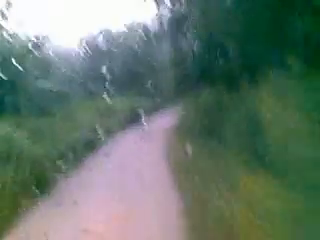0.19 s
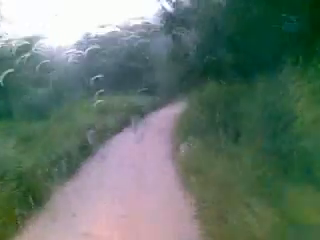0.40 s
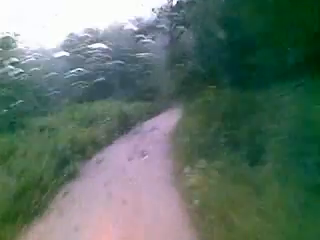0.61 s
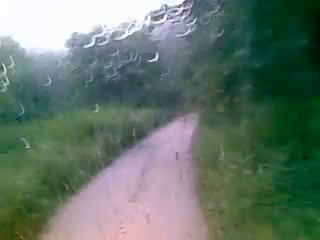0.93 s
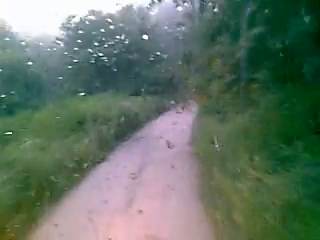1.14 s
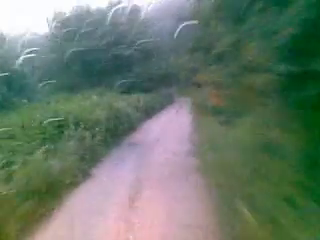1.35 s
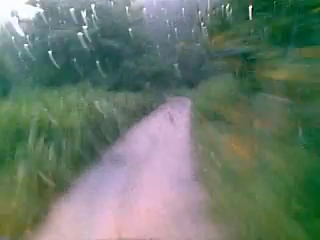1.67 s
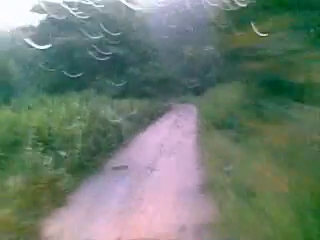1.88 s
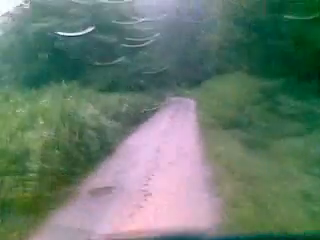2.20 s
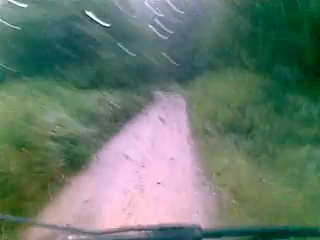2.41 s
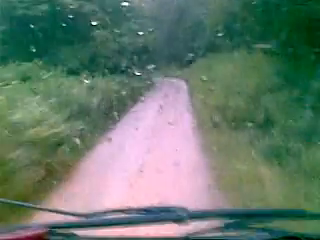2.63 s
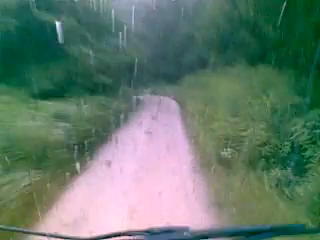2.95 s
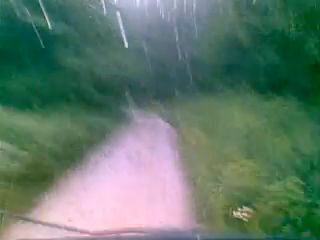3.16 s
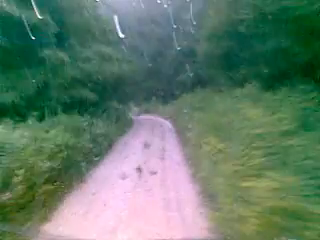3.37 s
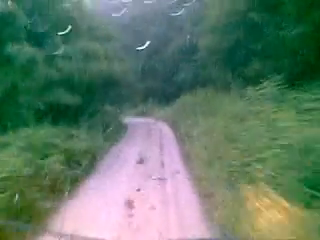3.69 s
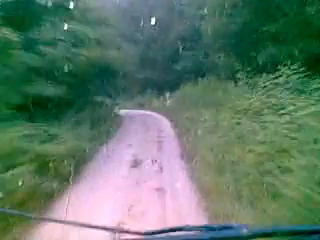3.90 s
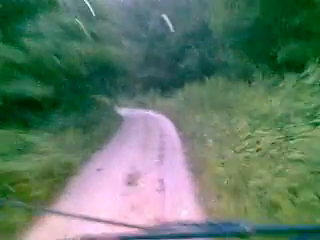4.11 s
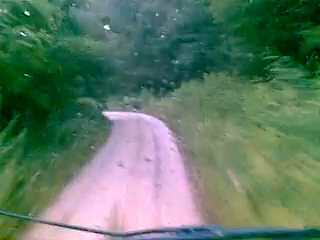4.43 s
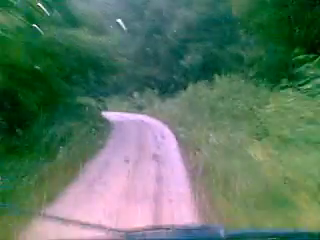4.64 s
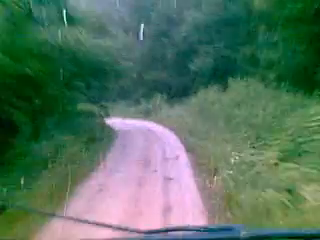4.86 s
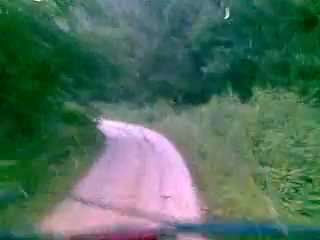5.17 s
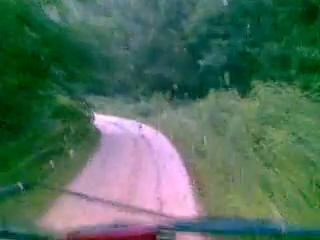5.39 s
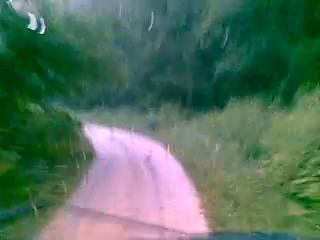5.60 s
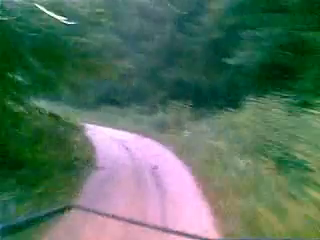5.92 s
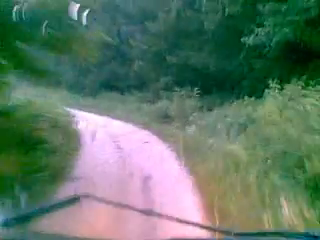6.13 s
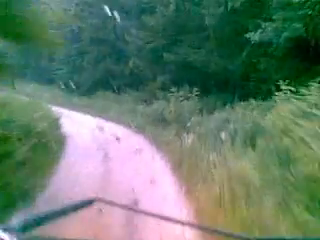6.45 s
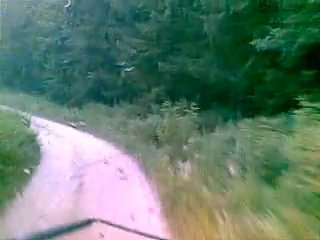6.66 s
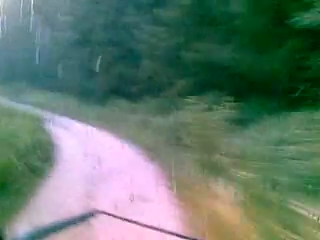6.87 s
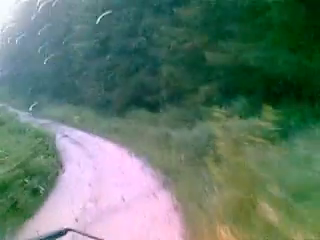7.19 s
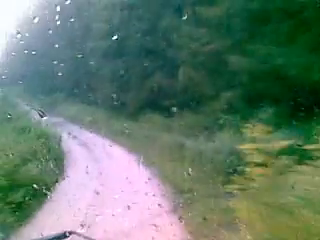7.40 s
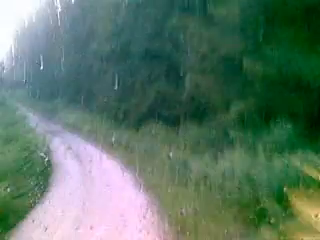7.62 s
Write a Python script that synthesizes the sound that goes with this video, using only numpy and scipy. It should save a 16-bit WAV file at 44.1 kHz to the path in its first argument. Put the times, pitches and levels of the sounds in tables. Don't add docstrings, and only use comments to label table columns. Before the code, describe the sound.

Inside a heavy diesel truck's cab on a rough track, a deep boom swells over ruts while the engine knocks and loose metal jingles.

```python
import sys
import numpy as np
from scipy import signal
from scipy.io import wavfile
from scipy.ndimage import uniform_filter1d

SR = 44100
rng = np.random.default_rng(int(sys.argv[2]) if len(sys.argv) > 2 else 0)


def linear_from_db(decibels):
    return 10 ** (np.asarray(decibels, float) / 20)


def output_pcm(signal):
    pcm = np.clip(np.atleast_2d(signal).T, -1, 1) * 32767
    wavfile.write(sys.argv[1], SR, np.round(pcm).astype(np.int16))


N = 344851
T = np.arange(N) / SR

# time in seconds, peak level of the knock in dB.
LOAD = [(0, -29), (.6, -30), (1.2, -32), (2, -32), (2.6, -29), (3.3, -28), (3.8, -29), (4.5, -27.5),
        (5.1, -27), (5.55, -26.5), (5.66, -32), (6.1, -37), (7.82, -42)]


def evened(x):
    return x / np.sqrt(np.mean(x ** 2) + 1e-20)


def columns(rows):
    s, *rest = np.transpose(rows)
    return [np.interp(T, s, column) for column in rest]


def add(mix, s, sound):
    part = mix[round(s * SR):][:len(sound)]
    part += sound[:len(part)]


def resonate(x, hz, width):
    return signal.lfilter(*signal.iirpeak(hz, hz / width, SR), x)


def drift(per_s):
    knots = rng.standard_normal(N // 64 + 1002)
    lowpass = signal.butter(2, min(per_s * 128 / SR, .9))
    smooth = signal.filtfilt(*lowpass, knots)[500:-500]
    return np.interp(np.arange(N) / 64, np.arange(len(smooth)), evened(smooth))


def bell(s, half):
    return np.exp(-.5 * ((T[::64] - s) / half) ** 2).repeat(64)[:N]


def swells(rows):
    return sum(linear_from_db(db) * bell(s, half) for s, db, half in rows)


def ring(modes, detune=0, shade_db=0):
    t = np.arange(4000) / SR
    out = np.zeros(len(t))
    for hz, db, t60 in modes:
        pitch = hz * (1 + detune * rng.standard_normal())
        level_db = db + shade_db * rng.standard_normal()
        out += linear_from_db(level_db - 60 * t / t60) * np.sin(2 * np.pi * pitch * t)
    return out * (1 - np.exp(-t / .0012))


def noise(shape, band, patchy_db, flicker_db, size):
    frames, hz = 4 * N // size + 5, np.fft.rfftfreq(size, 1 / SR)
    a, b, patches = rng.standard_normal((frames, len(hz), 3)).T
    patches = uniform_filter1d(patches, size=5, axis=0)
    patches = evened(uniform_filter1d(patches, size=9, axis=1))
    flicker = evened(uniform_filter1d(rng.standard_normal(frames), size=3))
    f, db = np.transpose(shape)
    colour = linear_from_db(np.interp(np.log(hz + 1), np.log(f + 1), db, left=-120, right=-120))
    z = (a + 1j * b) * colour[:, None] * linear_from_db(patchy_db * patches + flicker_db * flicker)
    inside = (hz > band[0]) & (hz < band[1])
    share = np.sqrt((abs(z[inside]) ** 2).sum() / (abs(z) ** 2).sum())
    sound = signal.istft(z, nperseg=size, noverlap=3 * size // 4)[1][:N]
    return evened(sound) / share


def cycles():
    # time in seconds, four-stroke cycles turned.
    turned = [(-0.034, -1), (0.055, 0), (0.766, 8), (1.488, 16), (2.219, 24), (2.956, 32), (5.163, 56),
              (5.533, 60), (5.72, 62), (5.912, 64), (6.294, 68), (6.68, 72), (7.071, 76), (7.465, 80),
              (7.95, 84.85)]
    return uniform_filter1d(columns(turned)[0], size=4001, mode="nearest")


def boom(turn):
    # time in seconds, peak level in dB, half length in seconds.
    ruts = [(0.006, -22.5, 0.28), (0.187, -21, 0.033), (0.362, -21.5, 0.02), (0.546, -22.5, 0.11),
            (0.855, -20, 0.042), (1.016, -16, 0.047), (1.211, -21, 0.069), (1.456, -16, 0.083),
            (1.738, -18, 0.066), (1.946, -20, 0.17), (2.457, -21, 0.057), (2.71, -22.5, 0.12),
            (3.024, -21, 0.031), (3.199, -24.5, 0.039), (3.383, -21, 0.11), (3.585, -19.5, 0.063),
            (3.939, -19, 0.059), (4.124, -22, 0.051), (4.342, -21, 0.13), (4.789, -24.5, 0.067),
            (5.075, -31, 0.068), (5.272, -29.5, 0.039), (5.545, -23.5, 0.083), (5.988, -17, 0.16),
            (6.282, -19.5, 0.076), (6.579, -24.5, 0.15), (6.869, -15, 0.076), (7.053, -18, 0.13),
            (7.384, -18, 0.085), (7.713, -20.5, 0.32)]
    # time in seconds, half length in seconds, drop in Hz.
    slack = (4.9, .2, 4.5)
    s, half, sag_hz = slack
    slip_hz = 1.6 - sag_hz * bell(s, half)
    phase = 2 * np.pi * (4 * turn + np.cumsum(slip_hz) / SR) + .35 * drift(14)
    rest_db = -40
    size = uniform_filter1d(linear_from_db(rest_db) + swells(ruts), size=128)
    return size * linear_from_db(1.2 * drift(18)) * np.sin(phase)


def hum(turn):
    orders = [8, 16, 21.3]
    rest_db = [-40, -44.5, -46.5]
    per_load = [0, 0, 0.86]
    # time in seconds, peak level in dB, half length in seconds.
    surges = [
        [(.12, -34, 0.07), (1.36, -27.5, 0.017), (1.81, -37, 0.04), (2.26, -32, 0.031), (2.85, -42, .15),
         (3.27, -25, 0.048), (3.49, -33, 0.052), (4.02, -37, 0.23), (4.65, -35.5, 0.048), (5.16, -32, 0.052),
         (5.47, -31, 0.022), (5.91, -28.5, 0.086), (6.3, -32.5, 0.032), (6.95, -33.5, 0.14)],
        [(1.1, -47.5, 0.24), (3.16, -38, 0.045), (5.98, -49, 0.15), (6.3, -43, 0.058), (6.9, -47, 0.043)],
        [(1.15, -41, 0.045), (1.65, -42, 0.066), (2.3, -41, 0.11), (2.52, -38.5, 0.057), (3.05, -39.5, 0.052),
         (4.37, -40, 0.051), (4.85, -38, 0.076)],
    ]
    # waves per engine cycle, level in dB.
    lumps = [(2, -40.5), (3, -63), (5, -61), (6, -52.5), (10, -50.5), (11, -50), (13, -52), (14, -50),
             (18, -62.5), (19, -51.5), (24, -59), (30, -61)]
    load_db = columns(LOAD)[0] + 29.0
    strong, faint = np.zeros(N), np.zeros(N)
    for order, db, share, rows in zip(orders, rest_db, per_load, surges):
        size = linear_from_db(db + share * load_db + 1.8 * drift(5.7)) + swells(rows)
        strong += size * np.sin(2 * np.pi * order * turn + .45 * drift(4.9))
    for order, db in lumps:
        wave = np.sin(2 * np.pi * (round(order) * turn + rng.random()))
        faint += linear_from_db(db + 1.5 * drift(9.8)) * wave
    return strong + np.sqrt(2) * faint


def blows(turn, place, db):
    at = np.flatnonzero(np.diff(np.floor(turn - place)) > 0)
    late, uneven_db = rng.standard_normal((2, len(at)))
    out = np.zeros(N)
    where = np.clip(at + (6 * late).astype(int), 0, N - 1)
    out[where] = linear_from_db(db + np.interp(T[at], *np.transpose(LOAD)) + uneven_db)
    return out


def knock(turn):
    # place as a fraction of the cycle, pitch in Hz, half length in seconds.
    loudest = (.02, 1130, .0008)
    # place as a fraction of the cycle, level in dB.
    lesser_knocks = [(.055, -9), (.1, -10), (.27, -9), (.39, -7), (.45, -7), (.53, -13), (.65, -10),
                     (.73, -11), (.8, -13), (.89, -8)]
    # place as a fraction of the cycle, level in dB.
    sump_knocks = [(.015, -11), (.23, -13), (.39, -14), (.45, -14), (.87, -13), (.95, -14)]
    # pitch in Hz, level in dB, time to die by 60 dB in seconds.
    block = [(925, -7, .025), (1050, -2.5, .022), (1220, -3, .018), (1350, -5, .018), (1535, -15, .015),
             (2050, -13, .012), (640, -9, .02)]
    # pitch in Hz, level in dB, time to die by 60 dB in seconds.
    sump = [(925, 0, .05)]
    place, hz, half = loudest
    t = np.arange(-150, 151) / SR
    tick = np.exp(-.5 * (t / half) ** 2) * np.sin(2 * np.pi * hz * t)
    out = signal.oaconvolve(blows(turn, place, 1.2), tick, "same")
    body = ring(block)
    lesser = sum(blows(turn, *row) for row in lesser_knocks)
    out += signal.oaconvolve(lesser, body / abs(body).max())[:N]
    low = sum(blows(turn, *row) for row in sump_knocks)
    out += signal.oaconvolve(low, ring(sump))[:N]
    taps = rng.standard_normal(N) * linear_from_db(4.4 * drift(56))
    clatter = evened(signal.oaconvolve(taps, body)[:N])
    return out + linear_from_db(-60.5 + 3.9 * (columns(LOAD)[0] + 29.0)) * clatter


def whines(turn):
    # start in seconds, end in seconds, start pitch in Hz, end pitch in Hz, level in dB.
    glides = [(0, 1.5, 1068, 1053, -52), (5.8, 6.2, 655, 664, -59), (6.28, 6.95, 661, 651, -55),
              (5.65, 6.05, 1248, 1215, -56), (6.1, 6.9, 1218, 1185, -55.5), (7, 7.9, 1175, 1153, -59),
              (5.3, 6.3, 928, 920, -62), (6.4, 7.9, 922, 904, -54.5), (5.7, 6.75, 990, 945, -57),
              (6.4, 6.92, 3242, 3250, -67)]
    out = np.zeros(N)
    for start, end, start_hz, end_hz, db in glides:
        hz = np.interp(T, [start, end], [start_hz, end_hz])
        on = 1. * (T >= start) * (T <= end)
        on = uniform_filter1d(on, size=6000, mode="nearest")
        if 900 < start_hz < 1100:
            on *= 1 + .6 * np.cos(2 * np.pi * turn)
        phase = 2 * np.pi * np.cumsum(hz) / SR + .7 * drift(16)
        out += on * linear_from_db(db + 1.5 * drift(11)) * np.sin(phase)
    return np.sqrt(2) * out


def road():
    # time in seconds, level in dB.
    track = [(0, 3), (.94, 2), (1.72, -1.5), (3.05, 0.5), (4.46, -0.5), (4.9, 1.5), (5.79, 1), (6.29, -2.5),
             (7.03, 0), (7.51, -4.5), (7.82, -3)]
    # time in seconds, level in dB.
    spray = [(0.0, -63), (0.15, -68), (1.18, -69), (1.83, -70), (2.22, -68), (4.64, -68), (5.31, -64.5),
             (6.47, -68), (7.01, -64), (7.21, -66.5), (7.49, -69), (7.82, -68)]
    # time in seconds, level in dB.
    pan_level = [(0.0, -51), (1.24, -53.5), (1.76, -53.5), (3.02, -50.5), (4.57, -48), (5.12, -44),
                 (5.6, -47.5), (5.92, -48), (6.34, -51.5), (6.95, -48), (7.36, -63), (7.82, -50)]
    # pitch in Hz, level in dB per Hz.
    rumble_shape = [(12, -45), (22, 2.5), (28, 7.5), (34, -3.5), (45, -4), (62, -16.5), (100, -11),
                    (150, -15.5), (225, -15), (285, -32), (400, -38), (600, -36)]
    # pitch in Hz, level in dB per Hz.
    roar_shape = [(150, -18), (250, -6), (378, -13.5), (665, -7), (753, -11), (944, -9), (1040, -7),
                  (1210, -7.5), (1460, -9.5), (2360, -15), (5000, -49.5), (6500, -37), (11000, -120)]
    # pitch in Hz, level in dB per Hz.
    hiss_shape = [(2350, 6), (4000, 2.5), (4960, -7), (6550, -3.5), (8220, -4), (11200, -8), (13000, -6.5),
                  (15500, -10)]
    rough_db = columns(track)[0]
    rumble = linear_from_db(-43.5 + 1.25 * rough_db) * noise(rumble_shape, (100, 155), 0.84, 0.86, size=8192)
    roar = linear_from_db(-52.0 + 0.87 * rough_db) * noise(roar_shape, (1500, 3000), 0.52, 0.97, size=512)
    hiss = linear_from_db(columns(spray)[0] + 0.74) * noise(hiss_shape, (7000, 14000), 1.7, 0.24, size=512)
    pan_hz, pan_width_hz = 329, 330
    pan = resonate(rng.standard_normal(N), pan_hz, pan_width_hz)
    pan = evened(resonate(pan, pan_hz, pan_width_hz))
    return rumble + roar + hiss + linear_from_db(columns(pan_level)[0] - 5.0 + 1.9 * drift(26)) * pan


def chatter():
    # time in seconds, taps per second.
    rate = [(0, 44), (.6, 100), (1.7, 35), (2.5, 10), (5, 8), (6.8, 3.5), (7, 25), (7.5, 20), (7.82, 8)]
    struck = rng.random(N) < columns(rate)[0] / SR
    size = linear_from_db(-56.5 + 2.0 * np.minimum(rng.exponential(1, N), 4)) * struck
    part = rng.integers(0, 8, N)
    band = signal.butter(1, [1800, 4500], "band", fs=SR)
    grit = signal.lfilter(*band, rng.standard_normal((8, 700)))
    grit *= linear_from_db(-60 * np.arange(700) / SR / 0.12)
    return sum(signal.oaconvolve(size * (part == k), g)[:N] for k, g in enumerate(grit))


def scratch():
    t, grit = np.arange(900) / SR, rng.standard_normal(900)
    band = signal.butter(2, [1300, 4300], "band", fs=SR)
    grit = signal.lfilter(*band, grit) + .16 * grit
    return grit * np.minimum(t / .001, 1) * linear_from_db(-60 * t / .045)


def rattles():
    # time in seconds, ring peak in dB, mount knock in dB above the ring.
    jingles = [(0.0094, -44.5, 9), (0.1002, -45.5, 10), (0.1206, -45.5, 12.5), (0.179, -44, 12),
               (0.3634, -58, 27), (0.403, -54, 21), (0.4434, -46.5, 10.5), (0.4778, -44.5, 11),
               (0.5018, -53.5, 20), (0.5445, -45, 10), (0.5638, -47, 12), (0.5861, -43.5, 11),
               (0.8617, -42, 9.5), (0.9517, -47.5, 15), (0.9732, -44, 12.5), (0.9946, -42.5, 10),
               (1.2133, -43, 12), (1.375, -48.5, 16), (1.503, -52.5, 17), (1.6402, -50.5, 18.5),
               (1.9046, -55.5, 21), (2.3675, -48.5, 18), (2.7741, -51, 13.5), (3.024, -49, 18),
               (3.1802, -50, 12), (3.8921, -43, 12), (4.9586, -51, 14.5), (5.0725, -44, 10),
               (5.5034, -50.5, 15), (6.2487, -56, 21)]
    # time in seconds, ring peak in dB.
    touches = [(.0498, -51), (.2094, -60), (.5282, -59), (0.7043, -63), (.9266, -60), (1.5913, -54),
               (2.192, -52), (4.85, -60), (2.45, -59), (5.8845, -55), (6.4313, -58)]
    # time in seconds, peak in dB.
    taps = [(0.0687, -40), (0.0498, -36), (0.3401, -36), (1.0318, -33), (1.6077, -35), (1.663, -30),
            (1.682, -35), (1.5902, -37), (1.989, -33), (2.1437, -35), (0.8016, -40), (2.1925, -34),
            (2.396, -39), (3.041, -31), (3.269, -41), (6.4313, -38.5), (7.0347, -31.5), (7.1109, -38),
            (7.155, -36), (7.2007, -37), (7.227, -33.5), (7.253, -32), (7.4024, -35), (7.502, -45),
            (5.002, -38), (5.39, -38), (2.648, -42), (5.2255, -39), (6.5814, -46)]
    # pitch in Hz, level in dB, time to die by 60 dB in seconds.
    fitting = [(5490, 6, .022), (5620, 1, .016), (5510, -22, .07), (6280, -6, .025), (4150, -12, .014),
               (3450, -10, .016), (8750, -18, .016), (10400, -16, .018), (11800, -16, .018),
               (13700, -12, .018)]
    # pitch in Hz, level in dB, time to die by 60 dB in seconds.
    mount = [(1650, -7, .010), (2040, 5, .02), (2250, 5, .017), (2480, 1, .013), (2950, -5, .012),
             (3500, -7, .014), (4100, -10, .013)]
    out = np.zeros(N)
    for s, db, mount_db in list(jingles) + [(s, db, 6) for s, db in touches]:
        add(out, s, linear_from_db(db - 2.5) * ring(fitting, .005, 1.8))
        add(out, s, linear_from_db(db + mount_db - 3.5) * ring(mount, .034, 2.5))
        add(out, s, linear_from_db(db + 0.61 * mount_db - 2.5) * scratch())
    for s, db in taps:
        add(out, s, linear_from_db(db - 6.5) * ring(mount, .03, 1.5))
        add(out, s, linear_from_db(db - 8.5) * scratch())
    return out


def snaps():
    # time in seconds, peak in dB.
    landings = [(.0105, -53), (.0505, -60), (.1005, -57), (.1211, -52), (.1795, -53), (.2095, -58),
                (.341, -58), (.3641, -51), (.403, -56), (.444, -57), (.478, -54), (.5028, -53),
                (.5452, -55), (.5636, -53), (.5866, -51), (.802, -58), (.8619, -50), (.9542, -54),
                (.974, -55), (.9941, -50), (1.033, -57), (1.052, -58), (1.1303, -57), (1.2141, -50),
                (1.241, -58), (1.3324, -52), (1.3763, -54), (1.4975, -51), (1.5893, -54), (1.608, -58),
                (1.6397, -56), (1.664, -54), (1.9046, -53), (1.99, -57), (2.0687, -47), (2.193, -56),
                (2.3677, -52), (2.7741, -58), (3.024, -56), (3.0416, -53), (3.1788, -55), (3.8922, -55),
                (4.9586, -58), (5.072, -53), (6.9128, -49), (7.1089, -49), (7.1553, -53), (7.254, -57)]
    # pitch in Hz, width in Hz, level in dB.
    bright = [(6900, 900, -1), (7600, 1200, 0), (9000, 1500, 0), (10700, 1200, -7), (11900, 1000, -4),
              (13600, 1200, -2), (14800, 800, -11)]
    out, t = np.zeros(N), np.arange(1200) / SR
    for s, db in landings:
        grit, burst = rng.standard_normal(1200), np.zeros(1200)
        for hz, width, d in bright:
            burst += linear_from_db(d + 3.0 * rng.standard_normal()) * evened(resonate(grit, hz, width))
        fade = linear_from_db(db - 2 - 60 * t / 0.04)
        add(out, s, fade * np.minimum(t / .002, 1) * evened(burst))
    return out


def squeak():
    rub = (.772, 7400, -56, .012)
    s, hz, db, half = rub
    hump = np.exp(-.5 * ((T - s - half) / half * 2) ** 2)
    return linear_from_db(db) * hump * np.sin(2 * np.pi * hz * T + drift(150))


def pings():
    # time in seconds, peak in dB, pitch in Hz, time to die by 60 dB in seconds.
    strikes = [(2.5, -36, 700, .03), (2.033, -33, 1260, 0.065), (1.8, -42, 1400, .04),
               (2.061, -38, 526, .07), (7.503, -44, 2300, .02), (7.5055, -45, 3300, .02),
               (2.067, -33, 3430, .03), (2.068, -44, 1400, .04), (6.92, -35.5, 250, .14),
               (6.914, -31, 519, .08), (6.9135, -29, 700, .06), (6.914, -35, 840, .05),
               (6.9135, -38, 1384, .06), (7.5, -35, 1770, .06), (6.9132, -35.5, 2049, .08),
               (6.9135, -33.5, 2210, 0.087), (6.922, -40, 2050, .05), (6.9135, -38, 1080, .04),
               (6.924, -37, 630, .05), (6.914, -44, 2750, .03), (6.9135, -43, 2480, .08),
               (6.9132, -42, 3854, 0.029), (6.9135, -46, 4200, .04), (6.951, -38, 270, .06),
               (7.037, -37, 950, 0.054), (7.036, -43, 2100, .03)]
    out = np.zeros(N)
    for s, db, hz, t60 in strikes:
        add(out, s, ring([(hz, db, t60)]))
    return out


def thumps():
    # time in seconds, peak in dB, pitch in Hz, time to die by 60 dB in seconds.
    hits = [
        (1.946, -38, 500, 0.1),
        (2.04, -41, 500, .1),
        (2.066, -40, 503, .08),
        (6.917, -41, 408, .05),
        (7.655, -46, 476, 0.088),
    ]
    out = np.zeros(N)
    for s, db, hz, t60 in hits:
        add(out, s, ring([(hz, db, t60), (0.88 * hz, db - 4.0, t60)]))
    return out


def jolts():
    # time in seconds, peak in dB, rise in seconds, time to die by 60 dB in seconds,
    # treble tilt in dB per octave.
    bumps = [
        (2.029, -35.5, 0.003, 0.077, -1.5),
        (2.034, -42, 0.019, 0.12, 2.5),
        (2.045, -44.5, 0.017, 0.048, -8),
        (2.064, -42.5, 0.0047, 0.053, 4),
        (2.078, -51, 0.0052, .07, 4.5),
        (6.9125, -30, 0.002, 0.067, 0.5),
        (6.92, -35.5, 0.0029, 0.059, 0.5),
        (6.93, -51, 0.0086, 0.23, 1),
        (7.035, -42.5, 0.0054, 0.068, -1),
    ]
    # pitch in Hz, width in Hz, level in dB.
    dash = [(294, 300, -7), (514, 65, 3.5), (840, 240, -1.5), (1290, 610, -2.5), (2300, 650, -5.5),
            (3750, 530, -10.5), (6200, 1400, -14), (12000, 4900, -22)]
    # time in seconds, peak in dB.
    cracks = [(6.9135, -37), (6.9165, -36), (6.9195, -37), (6.9235, -38), (6.929, -41), (6.955, -44),
              (7.038, -44)]
    # pitch in Hz, level in dB, time to die by 60 dB in seconds.
    shell = [(262, -3, .07), (400, -1, .05), (517, -3, .04), (690, -5, .03), (860, -4, .025),
             (1080, -6, .022), (1367, -3, .03), (1766, -3, .03), (2046, -2, .04), (2230, -1, .045),
             (2480, -4, .025), (3400, -7, .02), (3850, -5, .018), (6600, -13, .02)]
    out, t = np.zeros(N), np.arange(6000) / SR
    for s, db, rise, t60, tilt_db in bumps:
        grain = linear_from_db(2.5 * evened(uniform_filter1d(rng.standard_normal(len(t)), size=60)))
        fade = np.minimum(t / rise, 1) * linear_from_db(-60 * np.maximum(t - rise, 0) / t60)
        burst = grain * rng.standard_normal(len(t)) * fade
        panel = np.zeros(len(t))
        for k, (hz, width, d) in enumerate(dash):
            level = (-1) ** k * linear_from_db(d + tilt_db * np.log2(hz / 1000))
            answer = resonate(resonate(burst, hz, 3 * width), hz, 1.56 * width)
            panel += level * answer * np.sqrt(300 / width)
        add(out, s, linear_from_db(db + 11.5) * (panel + linear_from_db(-48.0 + 1.4 * tilt_db) * burst))
    for s, db in cracks:
        add(out, s, linear_from_db(db) * ring(shell, .015, 2.0))
    return out


def cab(x):
    t = np.arange(60, 5000) / SR
    signs = rng.choice([-1., 1.], len(t))
    tail = signs * (rng.random(len(t)) < .06) * linear_from_db(-60 * t / .08)
    return signal.oaconvolve(x, np.r_[np.zeros(60), tail / np.linalg.norm(tail)])[:N]


def scene():
    turn = cycles()
    near = rattles()
    struck = jolts() + chatter() + squeak() + thumps()
    engine = boom(turn) + hum(turn) + knock(turn) + whines(turn)
    echoes = linear_from_db(-4.5) * cab(struck + .6 * near)
    return (engine + road() + near + snaps() + pings() + struck + echoes)[None]


def starved(x):
    # pitch in Hz, rarity in standard deviations.
    rarity = [(4000, 2.6), (5000, 1.7), (7500, 2.0), (9500, 1.3), (11200, 1.0), (12600, 1.4), (14000, .9),
              (15000, .6)]
    hz, s, z = signal.stft(x, SR, nperseg=1024, noverlap=768)
    luck = rng.standard_normal((len(hz) // 4 + 1, len(s) // 8 + 1))
    luck = luck.repeat(4, 0).repeat(8, 1)[:len(hz), :len(s)]
    limit = np.interp(hz, *np.transpose(rarity), left=9)[:, None] + np.interp(s, [1.8, 2.5], [0, .15])
    kept = luck < limit
    return signal.istft(z * (.02 + .98 * kept), SR, nperseg=1024, noverlap=768)[1][:, :N]


def low_pass(x):
    return signal.sosfilt(signal.butter(12, 15680, fs=SR, output="sos"), x)


def record(dry):
    opening = np.minimum(T / .003, 1)
    return low_pass(starved(dry) * opening)


dry = scene()
out = record(dry)
output_pcm(out)
```